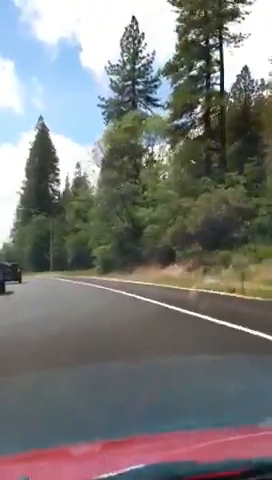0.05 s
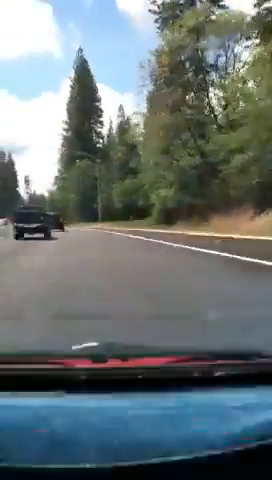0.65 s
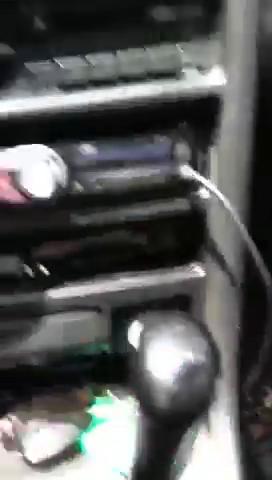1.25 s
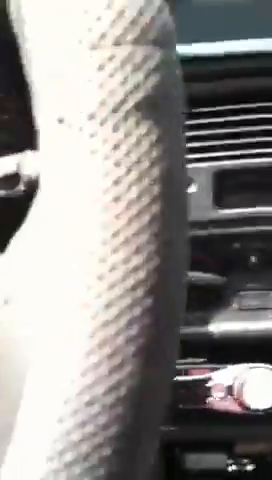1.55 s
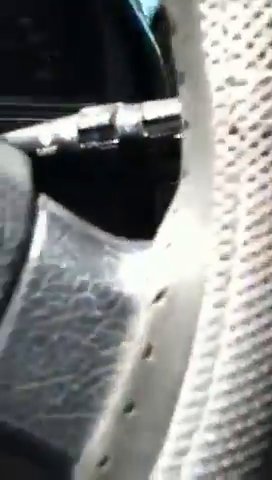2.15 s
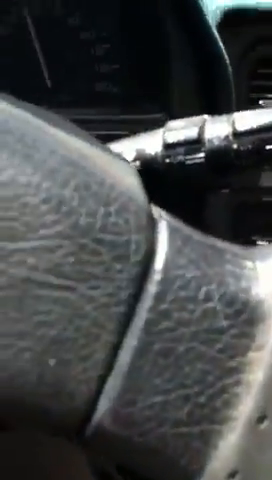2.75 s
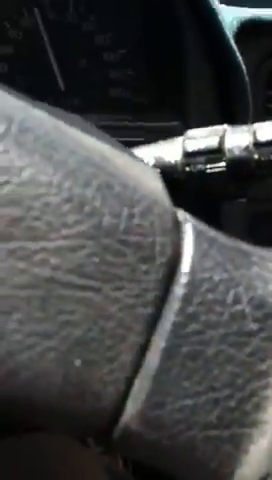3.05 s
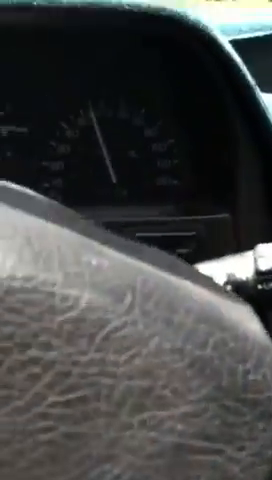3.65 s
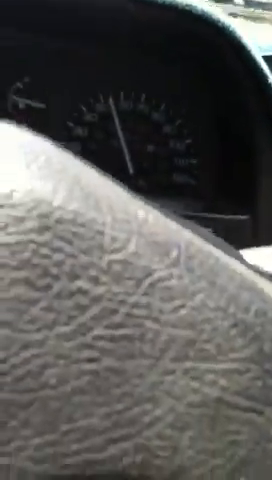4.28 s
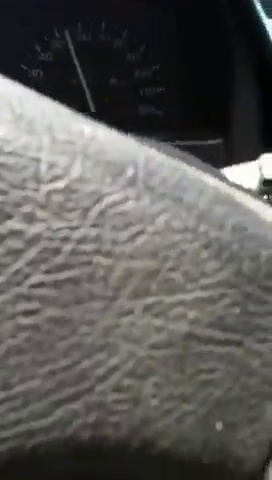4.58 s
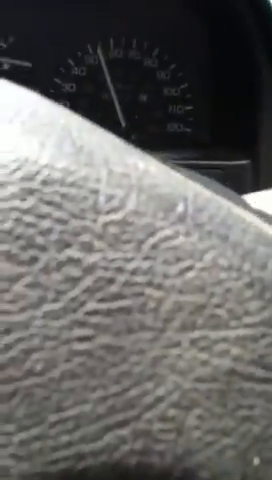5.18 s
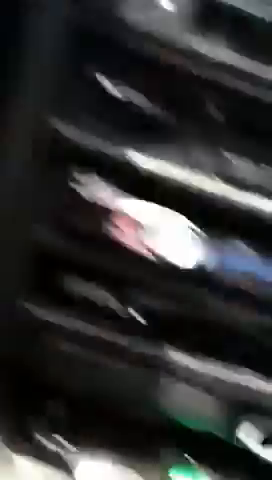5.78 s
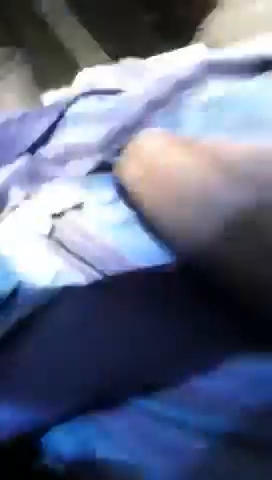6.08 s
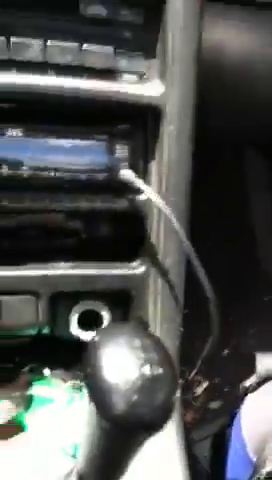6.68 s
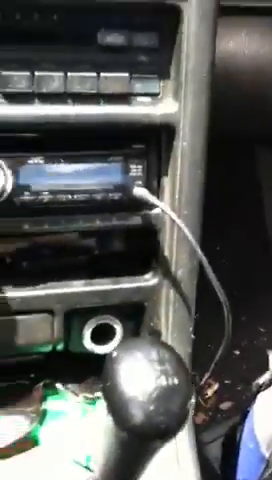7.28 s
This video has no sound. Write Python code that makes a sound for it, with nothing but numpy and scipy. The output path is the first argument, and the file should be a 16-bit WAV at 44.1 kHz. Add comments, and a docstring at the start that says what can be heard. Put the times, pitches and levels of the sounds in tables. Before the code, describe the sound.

An old car's engine drones throughout over low tyre rumble and rushing air, heard inside the cabin at highway speed through a moving hand-held microphone. For the first 0.6 seconds, by the windscreen, the sound is fuller and boomier, with faint finger rustles. It thins around 1 second as the microphone passes the console and reaches the steering wheel. From about 2 seconds the engine pitch slowly sinks a little, while light gusts of hiss swell and something loose in the dashboard faintly buzzes and ticks in spurts. From about 4 to 6 seconds, near the dials, the noise takes on a slightly hollow ring, with a small click at 4.3 seconds and a few tiny rattles. Just after 6 seconds the plastic trim snaps once, and soft handling rustles follow until about 6.7 seconds. The drone and road noise carry on to the end, just past 7 seconds.

```python
"""Inside an old car on a highway, the engine drones over roaring tyres and rushing air.
A hand-held microphone starts at the windscreen with a faint rustle, then passes the console and wheel;
hollows ring near it and the cabin's standing waves lift or cancel engine tones. From about 2 s the car
slows a little, while loose trim buzzes and ticks. Near 4 s the microphone reaches the dials. Just after
6 s the trim snaps once, and the microphone rustles over the lap to rest by the gear shifter."""
import sys
import numpy as np
from scipy import signal
from scipy.fft import rfft, irfft
from scipy.io import wavfile

SR = 44100
rng = np.random.default_rng(int(sys.argv[2]) if len(sys.argv) > 2 else 0)


def to_wav(sig):
    """Store sig (one row per channel, or 1-D mono) as 16-bit WAV at the path in sys.argv[1].

    Samples outside -1..1 are clipped; the rate is SR.
    """
    pcm = np.clip(np.atleast_2d(sig), -1, 1) * 32767
    pcm = np.round(pcm).astype(np.int16)
    wavfile.write(sys.argv[1], SR, pcm.T)  # frames by channels


N = 323253
CRUISE_PER_S, CUTOFF_HZ = 78, 15000   # engine pulses a second at cruise; top of the treble


def from_db(db):
    """Turn decibels into a gain to multiply by."""
    return 10 ** (np.asarray(db) / 20)


def rms_one(x):
    """Scale a signal to an average size (rms) of 1."""
    return x / np.sqrt(np.mean(x ** 2) + 1e-20)


def in_time(rows):
    """Join (t/s, value) rows by straight lines, one value per sample."""
    times, values = np.transpose(rows)
    return np.interp(np.arange(N) / SR, times, values)


def arch(middle, length):
    """A rounded rise from 0 to 1 and back, timed in seconds."""
    return np.cos(np.pi * np.clip((np.arange(N) / SR - middle) / length, -.5, .5))


def swells(rows):
    """A gain with one smooth hump or dip per (middle t/s, length/s, change/dB) row."""
    return from_db(sum(change_db * arch(middle, length) ** 2 for middle, length, change_db in rows))


def drift(rate):
    """A smooth random wobble of size 1 that changes about `rate` times a second."""
    hz = np.arange(N // 2 + 1) * SR / N
    return rms_one(irfft(rfft(rng.standard_normal(N)) / (1 + (hz / rate) ** 2), N))


def coloured_noise(spectrum):
    """Steady noise of size 1, its tone shaped by (f/Hz, level/dB) rows."""
    hz, level_db = np.transpose(spectrum)
    bins = np.maximum(np.arange(N // 2 + 1) * SR / N, 1)
    gain = from_db(np.interp(np.log(bins), np.log(hz), level_db))
    gain *= np.minimum(bins / hz[0], 1) * np.minimum(hz[-1] / bins, 1) ** 4   # fade beyond both ends
    return rms_one(irfft(rfft(rng.standard_normal(N)) * gain, N))


def butter(x, hz, kind, order=2):
    """Keep the lows, the highs or one band of a sound."""
    return signal.sosfilt(signal.butter(order, hz, kind, fs=SR, output="sos"), x)


def ring(clicks, hz, t60):
    """Each click starts a tone that fades by 60 dB in t60 seconds."""
    decay, step = from_db(-60 / (t60 * SR)), 2 * np.pi * hz / SR
    return signal.lfilter([0, np.sin(step)], [1, -2 * decay * np.cos(step), decay ** 2], clicks + 1e-18)


def pulsing(cycles, depth):
    """A gain that rises and falls once per engine pulse."""
    return 1 + depth * np.cos(2 * np.pi * cycles)


# Where the microphone rests: place, arrives t/s, leaves t/s
MIC_STOPS = [("screen", 0, .6), ("console", .96, 1.38), ("wheel", 1.5, 3.3), ("dials", 3.85, 5.8),
             ("lap", 6.08, 6.38), ("shifter", 6.58, 7.33)]
def at_microphone(usual_db, **near_db):
    """A sound's gain as the microphone glides about; each named place adds its dB to the usual level."""
    return in_time([(t, from_db(usual_db + near_db.get(place, 0)))
                    for place, *stay in MIC_STOPS for t in stay])


# Slips of the hand: middle t/s, length/s, level/dB
RUSTLES = [(.04, .04, -58), (.43, .07, -60), (.51, .07, -56.5), (6.12, .07, -62), (6.19, .07, -63),
           (6.29, .14, -63), (6.52, .06, -59), (6.67, .16, -63)]
# Their tone: f/Hz, relative level/dB
RUSTLE_SPECTRUM = [(1500, -24.5), (3200, -8.5), (4200, 3), (5200, -4.5), (6500, -8.5), (10000, -29)]
def rustle():
    """Fingers and cloth slip on the microphone's case in brief, grainy scrapes."""
    rubbing = sum(from_db(level_db) * arch(middle, length) for middle, length, level_db in RUSTLES)
    return rubbing * rms_one(coloured_noise(RUSTLE_SPECTRUM) * from_db(2.2 * drift(260)))


# Gusts of wind: middle t/s, length/s, rise/dB
GUSTS = [(1.03, 0.64, 4), (1.92, .3, 4.5), (2.62, 0.78, 6), (3.05, 0.68, 5.5), (3.72, 0.78, 4),
         (4.7, 1.8, 4)]
def wind_gains():
    """Two gains: the gusts alone, and the gusty hiss, which is louder at some places."""
    gusts = swells(GUSTS)
    return gusts, gusts * at_microphone(-57, screen=3.7, dials=2.6, shifter=2.5)


# Tiny ticks swell into rattles: middle t/s, length/s, rise/dB
RATTLES = [(2.62, .1, 12), (3.05, .14, 2), (4.24, .1, 12), (4.39, .06, 7), (4.65, .1, 12), (4.84, 0.13, 8),
           (5.18, .06, 16)]
# Single clicks and taps: t/s, relative level/dB, brightness f/Hz
CLICKS = [(.436, -53, 5000), (1.283, -54, 7500), (2.849, -49.5, 8970), (3.79, -52, 8000),
          (4.239, -51, 9000), (4.333, -32, 2300), (6.125, -31.5, 10000), (6.987, -43, 4200)]
# The tones of the plastic: f/Hz, relative level/dB, time to fade by 60 dB/s
TRIM_TONES = [(1020, 6.5, .025), (1550, 1, .018), (2200, 4.5, .014), (3900, -10, .005), (4600, -10, .004),
              (5500, -3, .005), (6650, -2.5, .004), (7500, -4.5, .004), (9100, -10, .003)]
def trim(wind, ticks_per_s=220, echo_s=.1):
    """Plastic panels knock together: a few clear clicks among many tiny ticks, with a short echo."""
    sizes = rng.standard_normal(N) * wind * from_db(-16.5) * swells(RATTLES)
    touches = sizes * (rng.random(N) < ticks_per_s / SR)
    for t, level_db, brightness_hz in CLICKS:
        contact = butter(signal.unit_impulse(256), brightness_hz, "low")
        start = round(t * SR)
        touches[start:start + len(contact)] += from_db(level_db + 3.8) * contact
    direct = sum(ring(touches, hz, t60) * from_db(level_db) * (-1) ** k
                 for k, (hz, level_db, t60) in enumerate(TRIM_TONES))
    age = np.arange(SR // 4) / SR
    echo = rng.standard_normal(len(age)) * from_db(-60 * age / echo_s)
    return direct + from_db(-9) * signal.fftconvolve(direct, echo / np.linalg.norm(echo))[:N]


def ringing_noise(bands):
    """Noise of size 1 that rings in a few narrow bands, as it does in a hollow."""
    out = np.zeros(N)
    for hz, width_hz, level_db in bands:
        edges = [hz - width_hz / 2, hz + width_hz / 2]
        out += from_db(level_db) * rms_one(butter(rng.standard_normal(N), edges, "band"))
    return rms_one(out)


# Where the dashboard rings: f/Hz, width/Hz, relative level/dB
DASH_BANDS = [(1733, 140, 3), (1864, 47, -8), (2170, 120, -12.5)]
# Spurts of buzzing: middle t/s, length/s, rise/dB
SPURTS = [(.44, 0.11, 13), (.84, .2, 4.5), (.98, 0.19, 10), (1.88, 0.53, 6), (2.48, 0.16, 7),
          (2.72, 0.6, 4.5), (3.1, 0.3, 6.5), (3.57, 0.2, 5), (4.63, 0.3, 3), (4.82, 0.29, 6.5),
          (5.15, .25, 3.5), (6.29, .24, 5), (6.68, 0.24, 3)]
def dashboard_buzz():
    """Something loose behind the dashboard buzzes unevenly and flares in spurts."""
    buzz = ringing_noise(DASH_BANDS) * swells(SPURTS) * from_db(2 * drift(60))
    return buzz * at_microphone(-48, screen=-7, console=-2, shifter=.95)


# Where the console rings: f/Hz, width/Hz, relative level/dB
CONSOLE_BANDS = [(1190, 95, -6.5), (1556, 140, -0.5), (1950, 220, -6.5), (2297, 76, -10.5),
                 (2760, 220, -13.5), (3520, 490, -16)]
def console_hollow():
    """Driving noise rings around the centre console."""
    return ringing_noise(CONSOLE_BANDS) * at_microphone(-61, dials=8.6, lap=14.3, shifter=16.8)


# Where the hood over the dials rings: f/Hz, width/Hz, relative level/dB
HOOD_BANDS = [(1323, 130, -2.5), (1590, 140, -2.5), (2007, 160, 4), (2143, 140, 0.5), (2970, 220, -6.5),
              (4300, 1700, -23), (7160, 2200, -23)]
def dial_hood(gusts):
    """Noise rings in the hood over the dials and swells with the gusts."""
    return ringing_noise(HOOD_BANDS) * gusts * at_microphone(-60, dials=15, wheel=4.3)


# Where the steering column rings: f/Hz, width/Hz, relative level/dB
COLUMN_BANDS = [(627, 55, -0.5), (707.5, 70, 2), (1599, 180, -8), (2450, 150, -16), (3650, 330, -27.5)]
def column_hollow(cycles):
    """Engine noise pulses in the hollow around the steering column."""
    throb = ringing_noise(COLUMN_BANDS) * pulsing(cycles, depth=.64)
    return throb * at_microphone(-48.5, wheel=6.6, dials=9.9)


# Where the space under the windscreen rings: f/Hz, width/Hz, relative level/dB
SCREEN_BANDS = [(260, 74, -0.5), (338, 44, -4.5), (465, 98, 0.5), (577, 70, -11.5), (793, 130, -13),
                (1325, 240, -14.5), (1540, 130, -16), (2370, 720, -17.5)]
def windscreen_hollow():
    """Driving noise gathers under the windscreen, loud only from close by."""
    return ringing_noise(SCREEN_BANDS) * at_microphone(-57, screen=30.2, console=5.9)


# The tone of the rushing air: f/Hz, relative level/dB
RUSH_SPECTRUM = [(700, -15.5), (950, 0.5), (1240, 1), (1420, -4), (1660, -2), (2300, -11.5), (2850, -17),
                 (3300, -22), (3750, -27.5), (4200, -29), (5100, -29.5), (6000, -40.5), (7600, -41.5),
                 (10000, -51), (14000, -56.5)]
def air_rush(wind, split_hz=2764):
    """Air and tyre tread heard through the glass: a steady body and a hiss that follows the wind."""
    air = coloured_noise(RUSH_SPECTRUM)
    body = rms_one(butter(air, split_hz, "low", order=5))
    hiss = rms_one(butter(air, split_hz, "high", order=5))
    return body * at_microphone(-40, screen=1.8, dials=.54) + hiss * wind


def buffet(noise, cycles, split_hz=1400, flutter_db=1.4):
    """Swirling air makes the treble flutter, and all of the noise throbs faintly with the engine."""
    low = butter(noise, split_hz, "low", order=3)
    high = butter(noise, split_hz, "high", order=3)
    return (low + high * from_db(flutter_db * drift(36))) * pulsing(cycles, depth=.04)


# The tone of the tyre rumble through the floor: f/Hz, relative level/dB
ROAD_SPECTRUM = [(20, -35.5), (45, -30), (80, -13), (110, -11), (140, -1), (200, 1.9), (280, -2), (390, -3),
                 (450, -6), (520, -12.5), (570, -7), (650, -5), (730, -14), (850, -14), (1200, -44.5)]
def road_roar(speed):
    """The tyres shake the car's body, less as it slows; rough asphalt makes the roar waver."""
    change_db = .14 * (speed - CRUISE_PER_S) + .95 * drift(7.7)
    roar = coloured_noise(ROAD_SPECTRUM) * from_db(change_db)
    return roar * at_microphone(-28, screen=3.3, dials=.7, lap=-.3, shifter=-.6)


# An "order" is an engine tone at that many times the pulse rate.
# How each place lifts or weakens the orders: {place: {order: change/dB}}
STANDING_WAVES = { "screen": {3: -1, 3.5: 13, 4: 11.2, 5: 13, 5.5: 10, 6: 11.3, 7: 6, 8: 1.8, 9: 11.4, 10:
                  3, 15: 4, 16: 8, 17: 5.5}, "console": {2: 0.33, 3: 4.8, 5: 6.7, 6: 0.92, 8: -6, 16: 1.5},
                  "wheel": {2: .5, 3: 0.63, 4: 1.2, 5: -5.5, 6: 3.4, 8: 0, 9: 7.1, 16: 6.3}, "dials": {2:
                  0.94, 5: 7, 6: 6.6, 7: 5, 9: 6.6, 14: 6.4, 16: 4, 17: -3}, "lap": {2: -4.5, 3: 7.2, 8:
                  -6.5, 10: -7, 13: 13, 15: -6}, "shifter": {2: -1.6, 3: 5.25, 6: -13, 8: -8.5, 9: 1.5, 10:
                  -5, 13: 8, 15: -4}, }
# Quiet and loud spots on the way: {order: rows of middle t/s, length/s, change/dB}
CROSSINGS = {2: [(.58, 0.38, -1.5), (.9, 0.29, 2.5), (1.4, 0.74, -1.5), (3.9, 1.1, -4), (6.34, 0.32, -4)],
             3: [(.86, 0.78, -7), (1.55, 0.38, 3)], 4: [(1.15, 0.64, 0), (1.8, 1, 3), (3.0, 1, -1),
             (4.2, 0.4, -7)], 6: [(.84, .3, 1), (1.58, 0.65, -10), (2.1, 1, -4.5)], 8: [(.8, 0.43, -13),
             (1.13, 0.24, -10), (1.55, 0.37, 2.5), (2.0, 0.37, 0), (3.0, 0.58, -4), (5.65, 1, 1.5),
             (6.38, .25, -3.5), (6.68, 0.44, 7)], 9: [(1.6, 1.8, -16.5)], 16: [(1.65, 0.62, -7),
             (3.6, 3, 3.5), (6.45, 0.46, 8.5)]}
def standing_waves(order):
    """One engine tone's gain: its echoes add up at some spots in the cabin and cancel at others."""
    near_db = {place: changes.get(order, 0) for place, changes in STANDING_WAVES.items()}
    return at_microphone(0, **near_db) * swells(CROSSINGS.get(order, []))


# Strong tones that slide on or off a pitch the cabin rings at as the speed changes:
# {order: (base level/dB at cruise, change/dB per extra pulse a second)}
STRONG_ORDERS = {2: (-26.5, .9), 3: (-26, 0), 4: (-31.4, -1.5), 5: (-48.5, 0), 6: (-42.2, 1.3),
                 8: (-31.8, -0.48), 9: (-44, -2.5), 16: (-51.3, 0.71)}
# Weak tones that waver: {order: base level/dB}
WEAK_ORDERS = {1: -60, 3.5: -52, 4.5: -53, 5.5: -57, 7: -52, 8.5: -56, 10: -50.5, 11: -53.5, 12: -58, 13:
               -62, 14: -63, 15: -51.5, 17: -57}
def engine(speed, cycles):
    """A drone of tones locked to the engine's turning; uneven burning shakes them a little."""
    phase = 2 * np.pi * (cycles + .0015 * drift(6))
    levels = [(order, cruise_db + slope_db * (speed - CRUISE_PER_S))
              for order, (cruise_db, slope_db) in STRONG_ORDERS.items()]
    levels += [(order, level_db + 2 * drift(1.9)) for order, level_db in WEAK_ORDERS.items()]
    out = np.zeros(N)
    for order, level_db in levels:
        strength = from_db(level_db) * standing_waves(order) * (1 + .026 * drift(25))
        lag = 1.1 * order ** 2   # the car's body delays each tone differently, smearing pulses to a hum
        sway = .024 * order * drift(.94)   # the swaying microphone shifts the phase
        out += strength * np.sqrt(2) * np.sin(order * phase - lag + sway)
    return out


# The engine's slowly falling pulse rate: t/s, f/Hz
ENGINE_SPEED = [(0, 80.2), (1.6, 80.28), (2.4, 79.62), (3.8, 78.03), (5.3, 76.85), (6.2, 76.28),
                (7.33, 76.1)]
def scene():
    """Engine, road, air and trim as they reach the moving microphone."""
    speed = in_time(ENGINE_SPEED)
    cycles = np.cumsum(speed) / SR   # engine pulses so far
    gusts, wind = wind_gains()
    drone = engine(speed, cycles)
    roar = road_roar(speed)
    air = air_rush(wind)
    ringing = (windscreen_hollow() + dial_hood(gusts) + column_hollow(cycles)
               + dashboard_buzz() + console_hollow())
    ticks = trim(wind)
    cabin = buffet(air + ringing, cycles)
    return (drone + roar + cabin + ticks + rustle())[None, :]


def record(dry):
    """Cut off the highest treble steeply."""
    return signal.sosfilt(signal.ellip(10, .1, 80, CUTOFF_HZ, fs=SR, output="sos"), dry)


dry = scene()
out = record(dry)
to_wav(out)
```